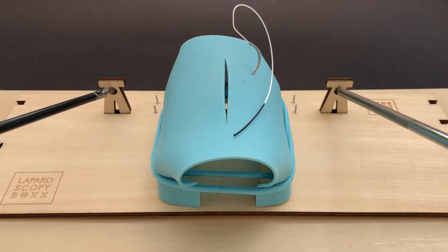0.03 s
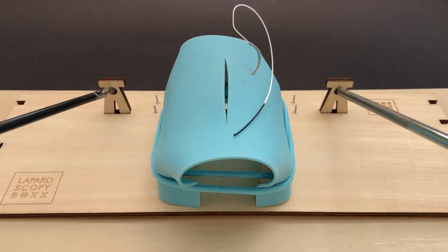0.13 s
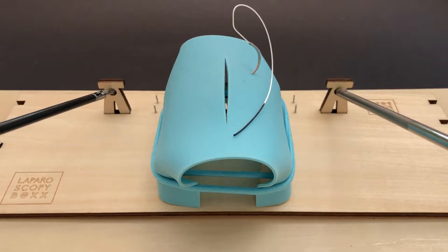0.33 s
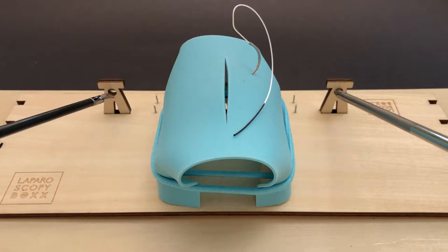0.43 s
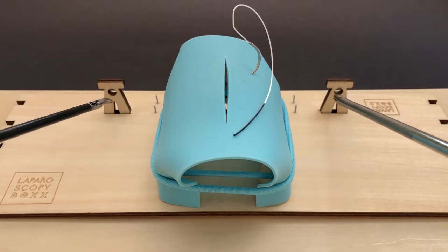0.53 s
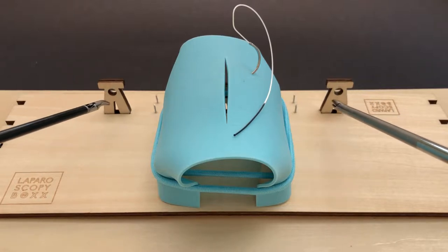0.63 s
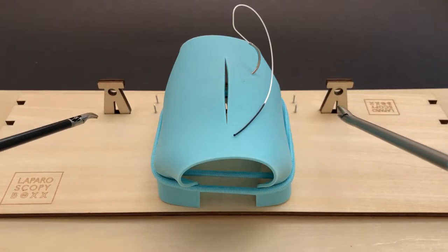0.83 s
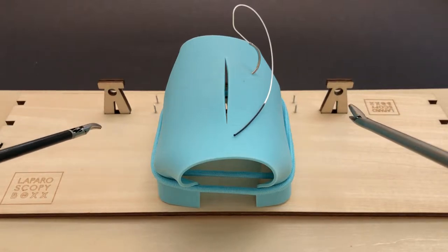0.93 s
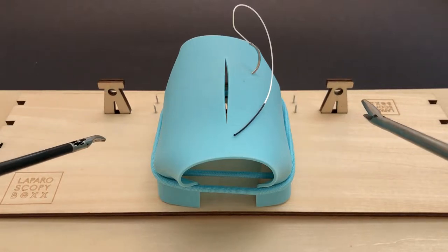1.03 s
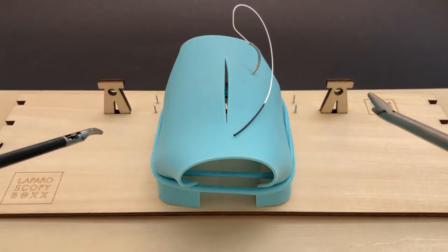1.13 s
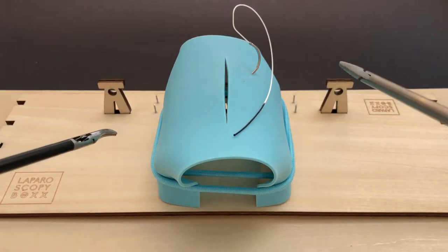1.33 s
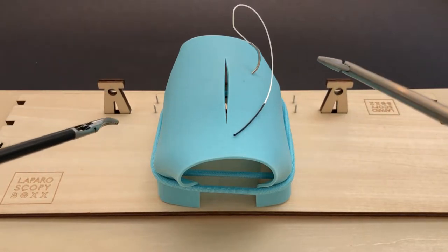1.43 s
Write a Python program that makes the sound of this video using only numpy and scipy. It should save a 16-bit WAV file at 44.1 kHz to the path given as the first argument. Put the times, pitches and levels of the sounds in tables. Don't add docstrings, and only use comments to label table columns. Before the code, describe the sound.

One sharp, bright ratchet click from a surgical training instrument rings briefly in a quiet room, followed by a smaller tick, faint sliding of long shafts with thin squeaks, and a soft knock on hollow plywood.

```python
import sys
import numpy as np
from scipy import signal
from scipy.io import wavfile

SR = 44100
rng = np.random.default_rng(int(sys.argv[2]) if len(sys.argv) > 2 else 0)


def volts_from_db(level):
    exponent = np.asarray(level, float) / 20
    return 10 ** exponent


def int16_out(signal):
    q = np.round(np.clip(np.atleast_2d(signal).T, -1, 1) * 32767)
    wavfile.write(sys.argv[1], SR, q.astype(np.int16))


N = 66150


def rms_one(x):
    return x / np.sqrt(np.mean(x ** 2) + 1e-20)


def in_time(rows):
    return np.interp(np.arange(N) / SR, *np.transpose(rows))


def at_hz(points, hz):
    curve_hz, value = np.transpose(points)
    return np.interp(np.log(hz), np.log(curve_hz), value)


def drift(rate_hz):
    r = np.exp(-2 * np.pi * rate_hz / SR)
    wander = signal.lfilter([1], [1, -2 * r, r * r], rng.standard_normal(N + SR))
    return rms_one(wander[SR:])


def resonance(x, hz, width_hz):
    r = np.exp(-np.pi * width_hz / SR)
    poles = [1, -2 * r * np.cos(2 * np.pi * hz / SR), r * r]
    return signal.lfilter([(1 - r * r) / 2, 0, (r * r - 1) / 2], poles, x)


def bands(gain_db):
    edges = np.minimum(25 * 2 ** np.arange(0, 10, .5), 16500)
    white = rng.standard_normal((2, N + SR))
    out = np.zeros(N)
    for k, (low, high) in enumerate(zip(edges, edges[1:])):
        band = signal.butter(2, [low, high], "band", fs=SR, output="sos")
        out += volts_from_db(gain_db(np.sqrt(low * high))) * signal.sosfilt(band, white[k % 2])[SR:]
    return out


def struck(times, db, modes):
    first = int(min(times) * SR)
    t = (first + np.arange(SR // 16))[None] / SR - np.array(times)[:, None]
    strength = volts_from_db(np.array(db))[:, None] * (t > 0)
    t = np.maximum(t, 0)
    ring = np.zeros(t.shape[1])
    for k, (hz, level_db, t60) in enumerate(modes):
        dying = volts_from_db(level_db - 60 * t / t60) * np.sin(2 * np.pi * hz * t)
        ring += (-1) ** k * (strength * dying).sum(axis=0)
    out = np.zeros(N + SR)
    out[first:first + len(ring)] = ring
    return out[:N]


def cut(x, hz):
    return signal.sosfilt(signal.cheby2(16, 60, hz, fs=SR, output="sos"), x)


# time in seconds, then strength on pawl, on shell and on body in dB.
SNAP = [(0.2032, -15.5, -39.5, -46), (0.204, -17, -22.5, -30.5), (0.205, -12, -26, -21),
        (.2059, -29, -15, -26), (.2070, -38.5, -33.5, -21), (0.2097, -45, -23.5, -30.5)]
# pitch in Hz, level in dB, t60 in seconds.
PAWL = [(7200, -13, .013), (7600, -14, .009), (7980, -15, .012), (9070, -15, .012), (9540, -11, .012),
        (10100, -16, .008), (10600, -20, .008), (11160, -16, .009), (12270, -17, .014), (12900, -22, .008),
        (14600, -24, .009), (15460, -24, .009)]
# pitch in Hz, level in dB, t60 in seconds.
SHELL = [(3451, -15, 0.0096), (4120, -14.5, 0.01), (4330, -8, 0.0095), (4560, -9.5, 0.012),
         (4810, -10, 0.017), (5198, -8, 0.019), (6600, -28, 0.0098)]
# pitch in Hz, level in dB, t60 in seconds.
BODY = [(774, -26, 0.048), (1061, -34.5, 0.0092), (1290, -10, 0.012), (1501, -13, 0.021),
        (2197, -12.5, 0.014), (2550, -12, .012), (2730, -15, .008)]


def handle():
    s, pawl_db, shell_db, body_db = np.transpose(SNAP)
    return struck(s, pawl_db, PAWL) + struck(s, shell_db, SHELL) + struck(s, body_db, BODY) + spring()


def spring():
    start_s, rise_s, t60_s = .2030, .0009, .035
    caught_s, caught_t60_s = .2067, .008
    t = np.maximum(np.arange(N) / SR - start_s, 0)
    fade_db = -60 * (t / t60_s + np.maximum(t + start_s - caught_s, 0) / caught_t60_s)
    return volts_from_db(-13 + fade_db) * np.clip(t / rise_s, 0, 1) * np.sin(2 * np.pi * 8320 * t)


CRACK_S = .2029
# frequency in Hz, density in dB per Hz.
CRACK = [(290, -41), (500, -7), (729, -16.5), (807, -6), (1720, -15.5), (2500, -6.5), (6060, -14.5),
         (8210, -3), (16000, -25.5)]


def crack():
    rise_s, t60_s = .0017, .041
    t = np.arange(N) / SR - CRACK_S
    swell = volts_from_db(-26.5 - 60 * np.abs(t) / t60_s) * np.clip(t / rise_s, 0, 1)
    return swell * rms_one(bands(lambda hz: at_hz(CRACK, hz)))


# time in seconds, level in dB.
TICK = [
    (.3777, -32),
    (.3784, -39),
]
# pitch in Hz, level in dB, t60 in seconds.
LEVER = [(2500, -8, .004), (3560, -2, .0055), (4480, -8, .007), (5300, -4, .005), (6100, -12, .004),
         (6900, -13, .004), (8050, -10, .0036), (9500, -17, .003), (11450, -11, .005), (12900, -15, .004),
         (15230, -20, .003)]


def lever():
    return struck(*np.transpose(TICK), LEVER)


# time in seconds, peak in dB,
# pitch in Hz, t60 in seconds.
TAPS = [(.2042, -26.5, 5200, .008), (0.205, -26, 2250, 0.0073), (.2088, -32, 8200, .014),
        (.3795, -46.5, 817, 0.028), (.2127, -29.5, 8600, 0.011), (0.2136, -31.5, 8470, .01),
        (.4939, -47, 4400, .005), (.4942, -54, 3500, .008), (.503, -55, 3950, .015),
        (.5292, -49, 3400, .008), (.5306, -47, 2300, .007), (0.532, -51, 1005, 0.013),
        (.537, -54, 3820, 0.011), (.5386, -52.5, 1210, 0.0095), (0.9986, -57, 2480, 0.0073),
        (1.014, -66, 2600, .008), (1.024, -63, 2100, .008), (1.069, -65, 4200, 0.0068),
        (1.139, -61, 3100, .008), (1.3801, -53.5, 1806, 0.011), (1.3876, -46, 2140, 0.0079)]


def taps():
    return sum(struck([s], [db], [(hz, 0, t60)]) for s, db, hz, t60 in TAPS)


# start in seconds, peak in dB, pitch in Hz, rise and t60 in
# seconds.
TONES = [(.2046, -20, 3910, .0014, .026), (.2044, -27, 1062, .002, .03), (.3777, -37, 1540, .0017, .007),
         (.204, -56.5, 184, .009, .11), (.229, -51.5, 194, .021, .44), (.216, -60.5, 88.5, .031, .51),
         (1.18, -62.5, 67.5, .07, .9), (1.121, -64.5, 241, .031, .21), (1.261, -65.5, 251, .021, .21),
         (1.3842, -50, 254, .0021, .17), (1.413, -54, 193, .029, .24), (1.467, -57, 192.5, .008, .08)]


def tones():
    out = np.zeros(N)
    for s, db, hz, rise, t60 in TONES:
        t = np.maximum(np.arange(N) / SR - s, 0)
        swell = volts_from_db(db - 60 * np.maximum(t - rise, 0) / t60) * np.minimum(t / rise, 1)
        out += swell * np.sin(2 * np.pi * hz * t)
    return out


# start and length in seconds, rms in dB, pitch and width in
# Hz.
SCUFFS = [(.164, .013, -58, 1220, 150), (.1632, .01, -62.5, 5310, 3000), (.1652, .011, -65, 2690, 210),
          (.1802, .0036, -64, 8110, 1490), (.1882, .0121, -55.5, 1110, 890),
          (.1972, .0051, -58, 6490, 3490), (.3902, .0051, -57.5, 810, 410), (.896, .066, -70.5, 5710, 410),
          (.4862, .034, -62, 3750, 500), (.761, .111, -72.5, 5810, 410), (.5162, .026, -57.5, 3510, 1200),
          (.5242, .016, -58.5, 2400, 1600), (.5182, .028, -62.5, 1300, 1500), (.5272, .016, -65, 900, 890),
          (0.72, .06, -71, 6900, 700), (0, 0.04, -78, 9960, 620), (0, 0.044, -66, 485, 330),
          (0.383, 0.17, -67, 1060, 680), (0.39, 0.14, -66.5, 3430, 2100), (0.527, 0.084, -67.5, 67.8, 16),
          (1.09, 0.045, -70, 5900, 400), (.765, 0.0067, -67, 1200, 1100), (0.979, 0.22, -69.5, 1766, 2200),
          (1.0, 0.03, -67, 1250, 600), (1.354, .004, -68, 3910, 350), (1.379, 0.0047, -55, 4000, 6600),
          (1.377, 0.02, -59, 1500, 1260), (1.385, 0.03, -63, 420, 250), (1.379, .005, -59, 3300, 900),
          (1.385, 0.0055, -56, 5900, 2500), (1.388, 0.04, -60.5, 1600, 1900),
          (1.39, 0.026, -65, 5500, 5000), (1.412, 0.055, -68, 5900, 440), (1.387, 0.0022, -53, 900, 1800),
          (.69, .3, -78, 14300, 2700)]


def scuffs():
    grains_per_s, spread_db = 6000, 3.5
    out, t = np.zeros(N), np.arange(N) / SR
    for s, length, db, hz, width_hz in SCUFFS:
        size = volts_from_db(spread_db * np.minimum(rng.exponential(1, N), 4))
        grains = size * rng.choice([-1, 1], N) * (rng.random(N) < grains_per_s / SR)
        swell = np.sin(np.pi * np.clip((t - s) / length, 0, 1) ** 0.46) ** .5
        ring = resonance(swell * rms_one(grains) + 1e-18, hz, width_hz)
        ring = resonance(ring, hz, 2 * width_hz)
        out += volts_from_db(db) * ring * np.sqrt(SR / 3 / width_hz)
    return out


# time in seconds, level in dB.
SLIDE = [(0, -81.5), (.1, -94.5), (.3, -72), (.5, -78.5), (.6, -73), (.72, -71.5), (.95, -69),
         (1.05, -68.5), (1.22, -70.5), (1.275, -78.5), (1.33, -80), (1.39, -67.5), (1.43, -74.5),
         (1.5, -79)]
# frequency in Hz, density in dB per Hz.
RUB = [(410, -40.5), (700, 1.5), (3320, -4.5), (3840, -3.5), (9730, -3.5), (14400, -16.5), (16000, -18)]
# pitch and width in Hz, level in dB.
SHAFT = [(5940, 900, -4.5), (6800, 1600, 3.5), (8600, 520, -11.5), (11000, 750, -6.5), (14300, 1760, 0.5)]


def shafts():
    hiss = rms_one(bands(lambda hz: at_hz(RUB, hz) - 24 * max(0, np.log2(700 / hz)) + 2.6 * drift(15)))
    white = rng.standard_normal((2, N))
    tubes = np.zeros(N)
    for hz, width_hz, db in SHAFT:
        tube = resonance(resonance(white[0], hz, width_hz), hz, width_hz)
        tubes += volts_from_db(db + 3.9 * drift(11)) * rms_one(tube)
    whistle_hz = 3830
    whistle = rms_one(resonance(resonance(white[1], whistle_hz, 150), whistle_hz, 300))
    whistle_db = -5.5 + 1.5 * drift(25) + catches()
    return volts_from_db(in_time(SLIDE)) * (hiss + volts_from_db(1.5 * drift(8.7)) * rms_one(tubes) + volts_from_db(whistle_db) * whistle)


# centre and length in seconds, lift in dB.
CATCHES = [(.606, .02, 7), (.635, .015, 4), (.69, .03, 11), (.73, .015, 4), (.80, .04, 6), (.895, .015, 4),
           (1.02, .016, 7), (1.046, .01, 8), (1.102, .018, 9), (1.14, .008, 7), (1.187, .014, 8),
           (1.227, .008, 8), (1.345, .025, 10)]


def catches():
    t = np.arange(N) / SR
    return -3 + sum(db * np.exp(-(2 * (t - s) / length) ** 4) for s, length, db in CATCHES)


# start in seconds, level in dB, rise and t60 in seconds.
BOOMS = [
    (0.206, -48, 0.029, 0.39),
    (1.018, -64, 0.017, 1),
    (1.382, -55.5, 0.0045, 0.44),
]
# pitch and width in Hz, level in dB.
BOARD = [(93, 16, -8.5), (148, 11, -5.5), (194.4, 12, 0.5), (235, 51, -4.5), (380, 43, -12), (493, 100, -9)]


def board():
    t = np.arange(N) / SR
    shake, hollow = np.zeros(N), np.zeros(N)
    for s, db, rise, t60 in BOOMS:
        shake += volts_from_db(db - 60 * np.maximum(t - s, 0) / t60) * np.clip((t - s) / rise, 0, 1)
    for hz, width_hz, db in BOARD:
        tone = resonance(resonance(rng.standard_normal(N), hz, width_hz), hz, 2 * width_hz)
        hollow += volts_from_db(db) * rms_one(tone)
    return shake * rms_one(hollow)


# pitch and width in Hz, level in dB.
LINGER = [(801, 61, -1), (1051, 81, -4), (2380, 520, 0), (3960, 400, 2), (4610, 910, 4.5), (7291, 301, 2),
          (8270, 590, 7.5), (9310, 790, 2.5), (11050, 201, 2.5), (12750, 151, 2)]


def wash():
    broad = volts_from_db(-41) * np.sqrt(SR / 40) * tail(CRACK_S, CRACK)
    return broad + sum(volts_from_db(db) * resonance(resonance(broad, hz, w), hz, 2 * w) for hz, w, db in LINGER)


def room(x):
    return signal.fftconvolve(x, tail(0, [(100, 0.004), (16000, 0.0042)]))[:N]


# frequency in Hz, t60 in seconds.
ECHO_T60 = [(300, 0.57), (1000, .45), (2500, 0.51), (5000, 0.44), (8500, 0.34), (13000, 0.37)]


def tail(start_s, spectrum):
    gap_s, rise_s = .0022, .0065
    t = np.maximum(np.arange(N) / SR - start_s, 0)
    out = bands(lambda hz: at_hz(spectrum, hz) - 60 * t / at_hz(ECHO_T60, hz))
    out *= np.clip((t - gap_s) / rise_s, 0, 1)
    return out / np.sqrt(np.sum(out ** 2))


# frequency in Hz, density in dB per Hz.
HUM = [(15, -44), (25, -15.5), (58, 5.5), (97, -3.5), (236, 1.5), (754, -12), (3250, -26), (3820, -25.5),
       (16000, -32.5)]
# time in seconds, level in dB.
RUMBLE = [(0, 2), (.14, 0), (.5, 1), (1.05, -2), (1.3, -3), (1.5, 0)]


def room_hum():
    return volts_from_db(-66 + in_time(RUMBLE)) * rms_one(bands(lambda hz: at_hz(HUM, hz) + 2 * drift(2.4)))


def scene():
    snap, rattle, scuff = handle(), crack(), scuffs()
    tick = lever() + taps()
    sent = snap + volts_from_db(-5.5) * tick + volts_from_db(5.5) * scuff
    thin = signal.butter(3, 600, "high", fs=SR, output="sos")
    near = signal.sosfilt(thin, snap + rattle + tick + volts_from_db(-16.5) * room(sent) + wash())
    soft = cut(scuff + board() + shafts() + room_hum(), 16080)
    low_cut = signal.butter(2, 35, "high", fs=SR, output="sos")
    return signal.sosfilt(low_cut, near + tones() + soft)[None]


def band_limit(x):
    return signal.sosfilt(signal.butter(12, 16570, fs=SR, output="sos"), x)


def record(dry):
    mix = cut(dry, 16800)
    return band_limit(mix)


dry = scene()
out = record(dry)
int16_out(out)
```